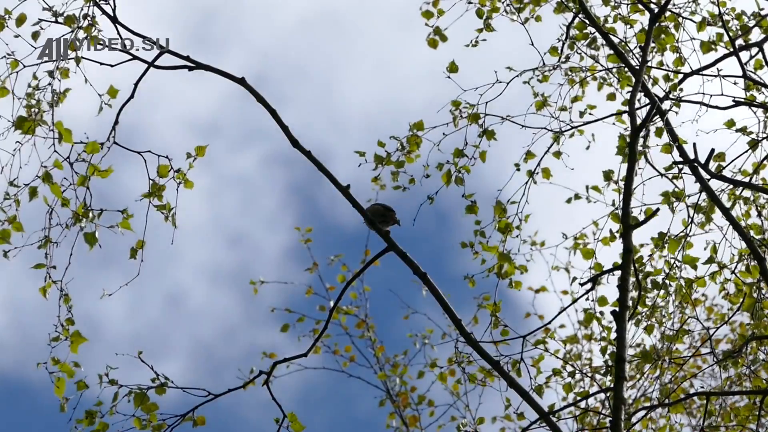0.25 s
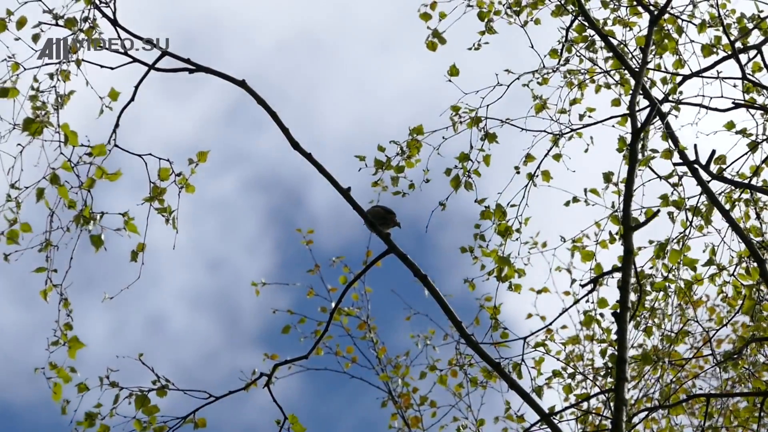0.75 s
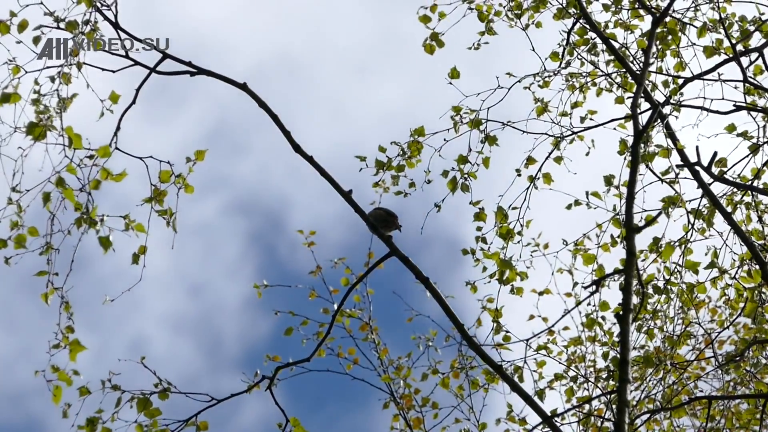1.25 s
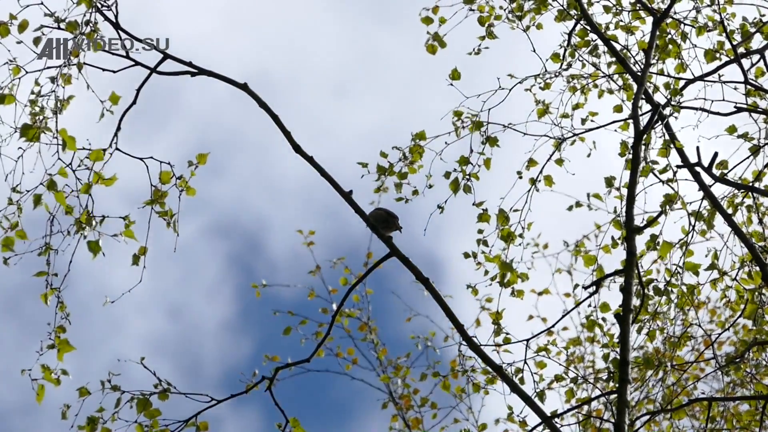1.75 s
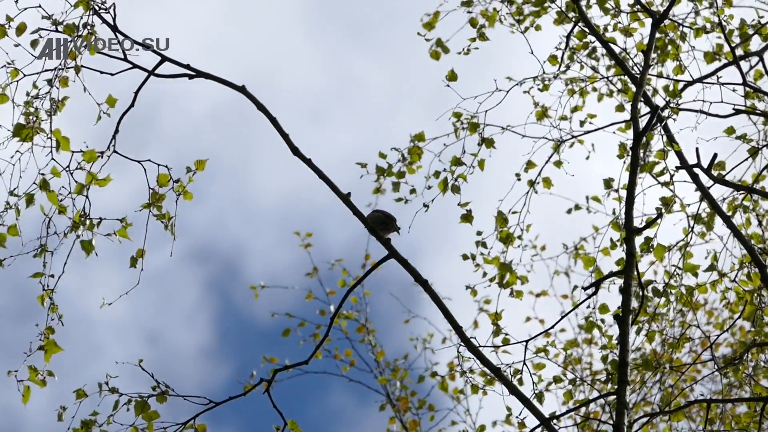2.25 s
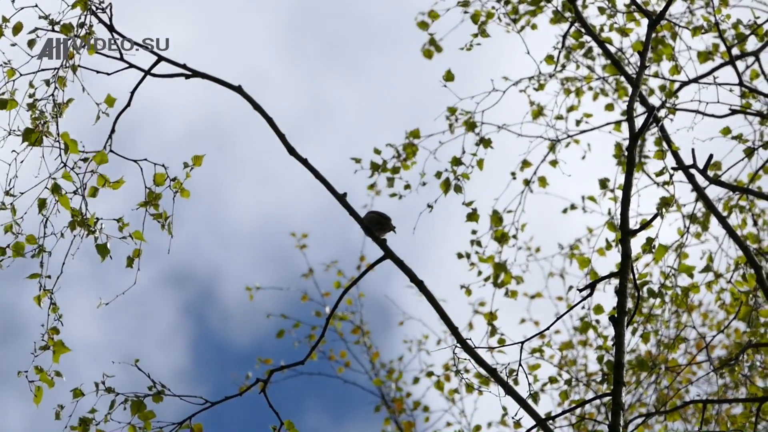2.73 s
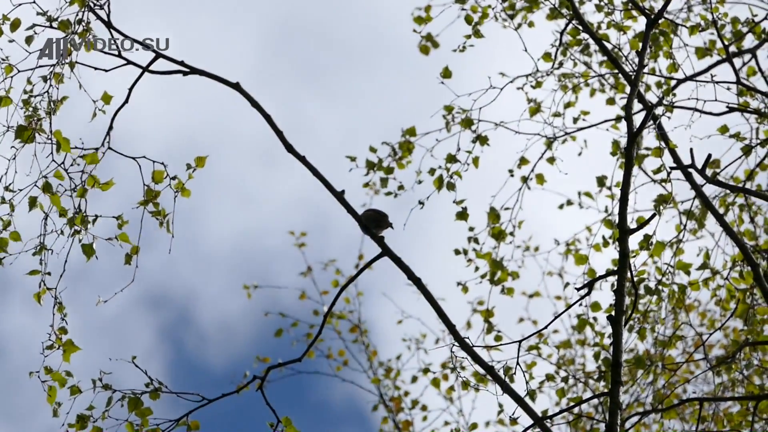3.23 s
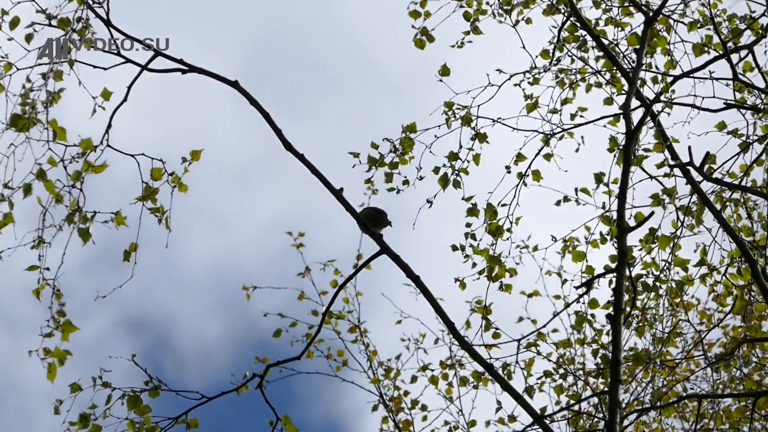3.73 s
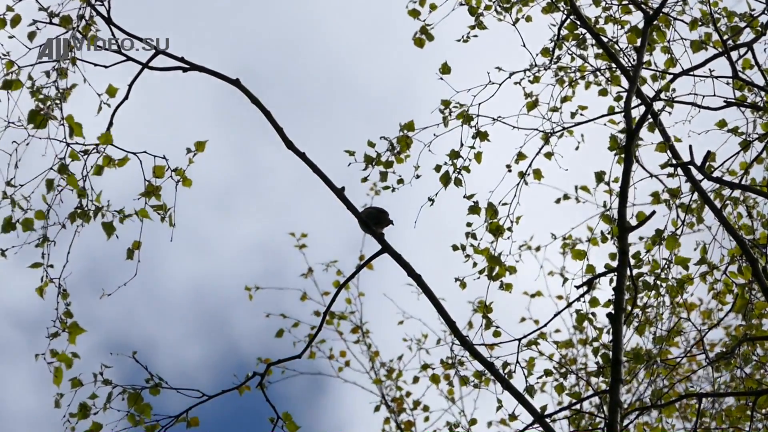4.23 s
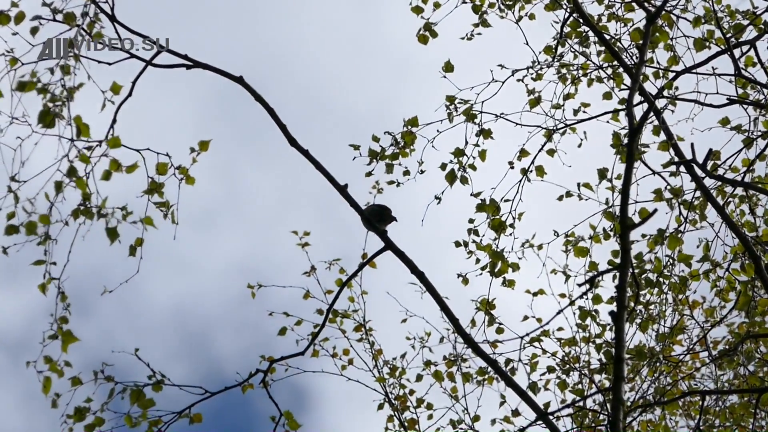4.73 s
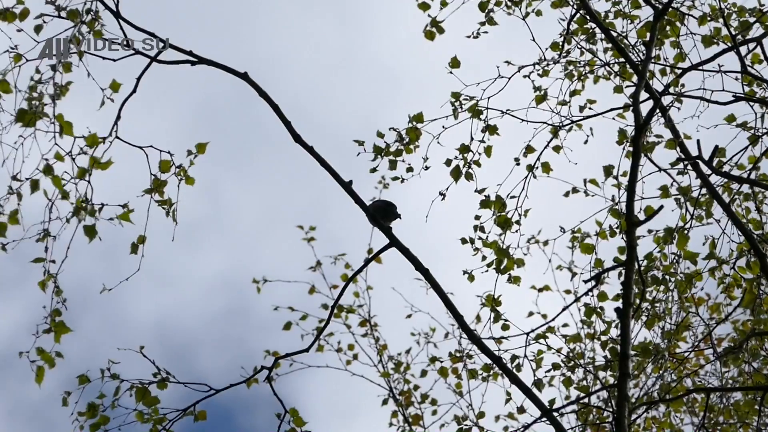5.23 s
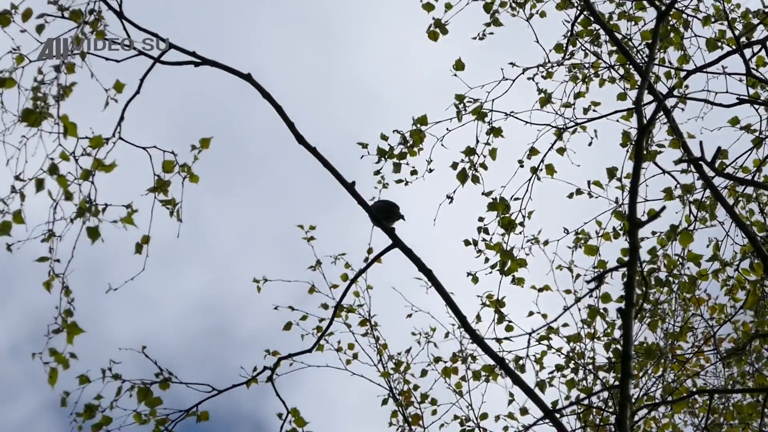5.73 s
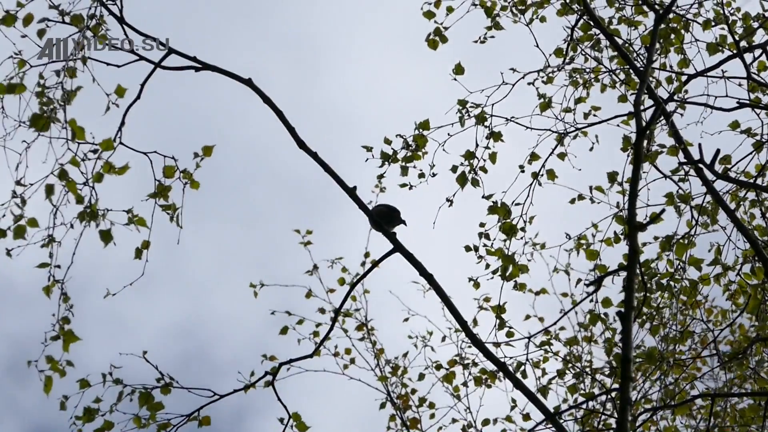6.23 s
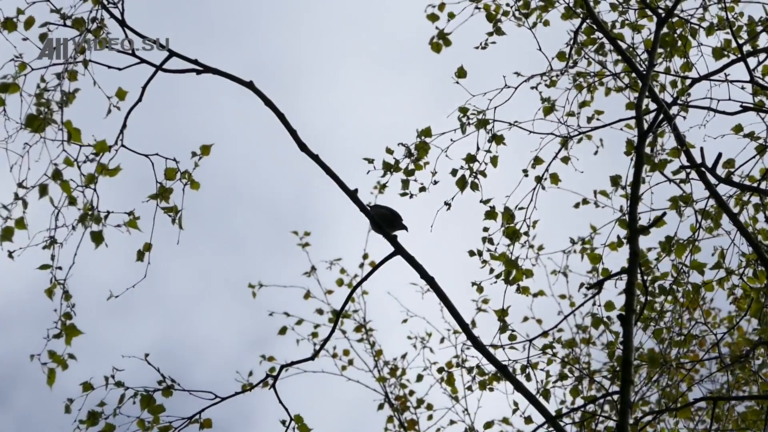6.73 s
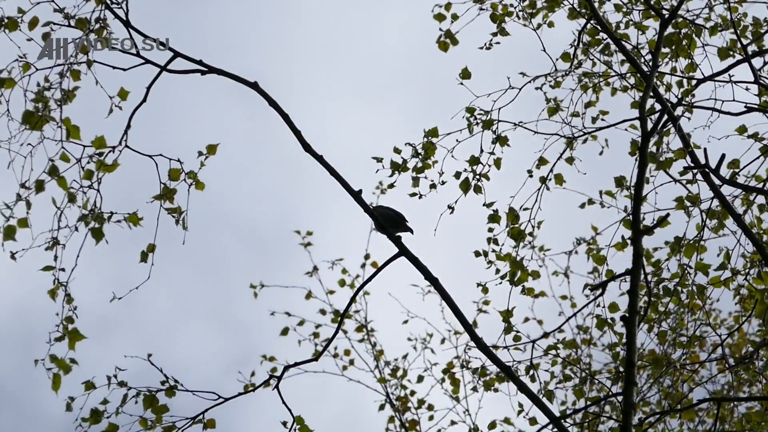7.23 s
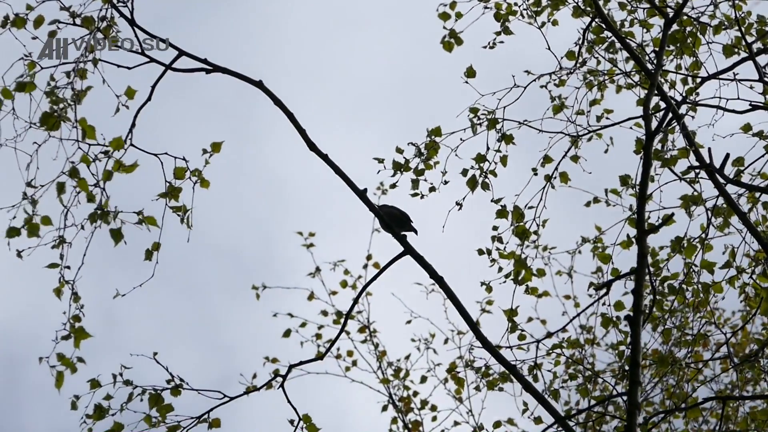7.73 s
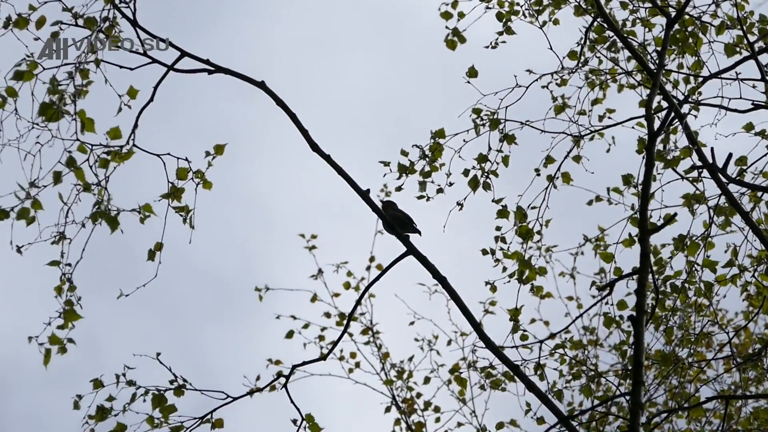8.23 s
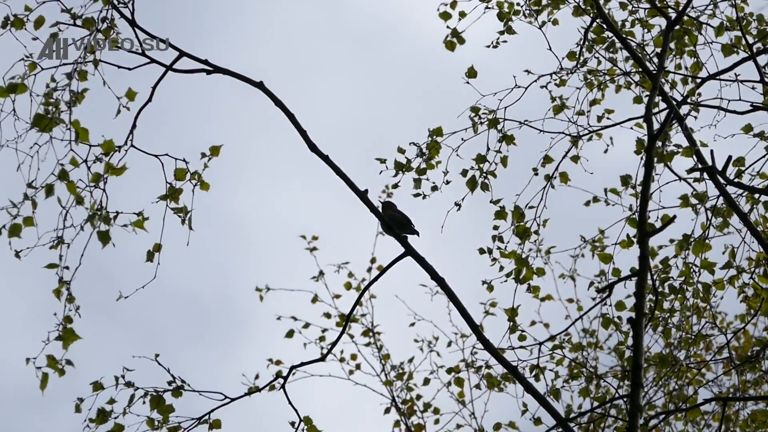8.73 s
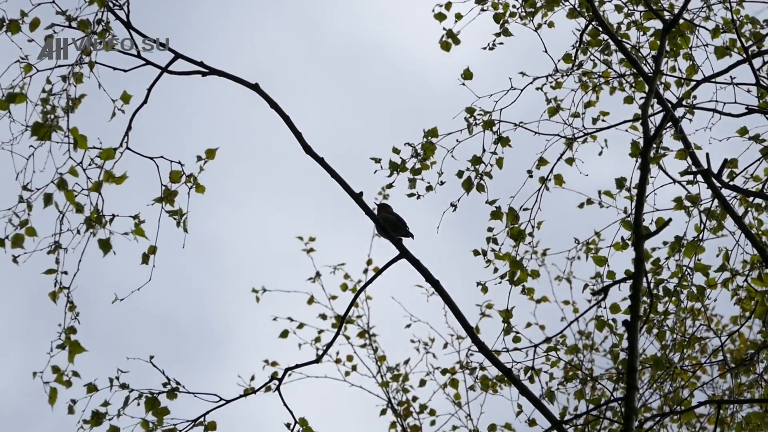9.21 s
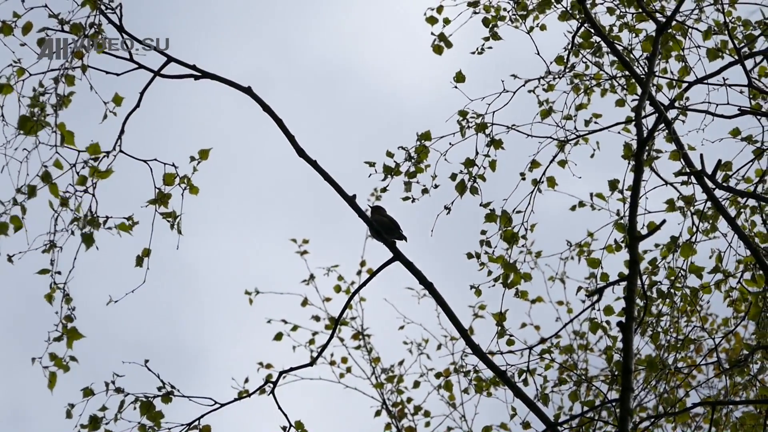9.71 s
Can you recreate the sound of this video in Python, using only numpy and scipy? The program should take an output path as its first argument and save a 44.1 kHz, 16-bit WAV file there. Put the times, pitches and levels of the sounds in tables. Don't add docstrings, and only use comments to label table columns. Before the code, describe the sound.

High, sweet robin song in two quick bursts rings among the trees, with fainter birds answering between, a few dry twig snaps and soft air.

```python
import sys
import numpy as np
from scipy import signal
from scipy.fft import rfft, irfft, next_fast_len
from scipy.io import wavfile
from scipy.ndimage import uniform_filter1d, map_coordinates

SR = 44100
rng = np.random.default_rng(int(sys.argv[2]) if len(sys.argv) > 2 else 0)


def to_wav(s):
    ch = np.atleast_2d(s).T
    pcm = np.round(np.clip(ch, -1, 1) * 32767)
    wavfile.write(sys.argv[1], SR, pcm.astype(np.int16))


def undo_db(level):
    steps = np.asarray(level, float) / 20
    return 10 ** steps


N = 439677

# (share of note [0-1], way from main to outer pitch [0-1], level [dB])
SWELL = [(0, 1.0, -10), (0.551, .1, 0.0), (1, 0.055, -17.5)]


def unit(x):
    return x / np.sqrt(np.mean(x ** 2) + 1e-20)


def along(points, hz):
    point_hz, value = np.transpose(points)
    return np.interp(np.log(hz + 1), np.log(point_hz + 1), value)


def wobble(rate, size=N):
    knots = rng.standard_normal(int(size * rate / SR) + 4)
    return map_coordinates(knots, [np.arange(size) * rate / SR])


def filtered(x, response):
    m = next_fast_len(N + 8192)
    return irfft(rfft(x, m) * response(np.fft.rfftfreq(m, 1 / SR)), m)[..., :N]


def add(track, s, sound):
    part = track[..., max(round(s * SR), 0):][..., :sound.shape[-1]]
    part += sound[..., :part.shape[-1]]


def pair(gain, alike):
    turn = lambda hz: np.arccos(np.clip(along(alike, hz), -1, 1)) / 2
    colour = lambda hz: gain(hz) * [np.cos(turn(hz)), np.sin(turn(hz))]
    mid, side = filtered(rng.standard_normal((2, N)), colour)
    return unit(np.array([mid + side, mid - side]))


def robin():
    # (time [s], haze [dB])
    breath = [(1.4, -12), (2.1, -25.5), (2.3, -35.5), (3.2, -22.5), (6.6, -15), (6.9, -11.5), (7.05, -35.5),
              (7.25, -36), (7.4, -31.5), (7.9, -46.5), (7.96, -21)]
    # (time [s], centre pitch [Hz], level [dB])
    buzzed = [
        [(2.579, 4520, -24.5), (2.595, 4630, -24.5), (2.62, 4735, -26.5), (2.66, 4573, -32.5),
         (2.715, 4480, -34)],
        [(7.29, 6990, -43), (7.31, 7630, -34), (7.335, 7970, -32.5), (7.358, 7900, -33)],
        [(6.878, 5320, -47.5), (6.89, 4790, -43.5), (6.897, 4430, -35), (6.906, 4616, -36), (6.917, 4575, -39)],
    ]
    # (flutter [dB], breath [dB], buzz rate [Hz], pitch swing [Hz], beat [0-1])
    buzz_settings = [(-6.0, -25.5, 198, 330, 0.49), (4.5, -28.0, 194, 200, 0.2), (2.0, -8.5, 188, 350, 0.2)]
    voice, edge_s = np.zeros(N), .004
    for note in song():
        haze_db = np.interp(note[0][0], *np.transpose(breath))
        add(voice, note[0][0], whistle(note, edge_s, flutter_db=.9, breath_db=haze_db))
    for note, (flutter_db, breath_db, buzz_hz, swing_hz, beat) in zip(buzzed, buzz_settings):
        add(voice, note[0][0], whistle(note, edge_s, flutter_db, breath_db, buzz_hz, swing_hz, beat))
    direct = undo_db(-0.5) * close(voice) * undo_db([[.3], [-.3]])
    heard = direct + undo_db(-6.0) * wood(voice, onset_s=0.0025)
    strain_gain = lambda hz: undo_db(along([(4000, -7.0), (5200, 8.0), (8500, 3.0)], hz))
    strain = filtered(heard[0], strain_gain)
    effort = np.sqrt(np.abs(uniform_filter1d(strain ** 2, size=2600)))
    rush_points = [(3500, -28.0), (6500, 6.5), (9800, -11), (12000, 1.5), (16000, -18.0)]
    rush = pair(lambda hz: undo_db(along(rush_points, hz)), [(6000, 0.9)])
    return heard + undo_db(-37) * effort * rush


def song():
    # (share of note [0-1], way from main to outer pitch [0-1, may overshoot], level [dB])
    rise = [(0, 0.88, -0.5), (0.202, 0.25, -3.5), (.42, 0.067, 4), (1, 0.096, -14)]
    # (share [0-1], way [0-1], level [dB])
    arch = [(0, 1, -4), (.13, .3, -4), (.33, 0.028, -3), (.65, .17, -2.5), (1, .6, -8)]
    # (share [0-1], way [0-1], level [dB])
    hook = [(0, .06, -4.5), (.55, .05, -10), (.8, 0, 0), (.88, .3, 3.5), (1, 1, -8)]
    # (share [0-1], way [0-1], level [dB])
    slide = [(0, 0.827, 2.5), (0.399, 0.48, -3.5), (1, 0.095, 2.5)]
    # (share [0-1], way [0-1], level [dB])
    drop_gesture = [(0, 0.95, -2), (.3, 0.85, -6), (1, 0.0, -20)]
    # (time [s], length [s], main pitch [Hz], outer pitch [Hz], level [dB])
    rises = [
        (1.655, 0.071, 5580, 4910, -33.5),
        (1.856, 0.077, 5070, 4530, -28),
        (6.622, 0.05, 4850, 3700, -44.5),
    ]
    # (time [s], length [s], main [Hz], outer [Hz], level [dB])
    arches = [
        (1.537, 0.079, 5910, 4496, -37),
        (1.752, .066, 5400, 4395, -28),
    ]
    # (time [s], length [s], main [Hz], outer [Hz], level [dB])
    hooks = [
        (1.597, .041, 6050, 4060, -35.5),
        (1.682, .049, 5940, 4070, -27),
    ]
    # (time [s], length [s], main [Hz], outer [Hz], level [dB])
    slides = [
        (3.034, 0.035, 3100, 4100, -32.5),
        (7.09, 0.0094, 2930, 3300, -44),
        (1.785, .048, 5760, 5720, -33),
    ]
    # (time [s], length [s], main [Hz], outer [Hz], level [dB])
    drops = [
        (6.931, 0.015, 2210, 3260, -36),
        (7.707, 0.0091, 6600, 8200, -28),
        (7.885, 0.02, 5840, 7670, -24.5),
    ]
    # (time [s], length [s], main [Hz], outer [Hz], level [dB])
    strands = [(1.57, 0.031, 6400, 5940, -44), (1.574, 0.051, 5893, 5840, -39),
               (1.68, .032, 6270, 6080, -43), (1.79, 0.018, 6320, 6160, -51), (6.95, .09, 3140, 3400, -50),
               (7.3, .05, 12150, 11200, -58), (6.885, 0.033, 8960, 9200, -55.5),
               (8.01, 0.026, 3990, 5500, -43.5), (8.174, 0.015, 5150, 6050, -40)]
    # (time [s], length [s], main [Hz], outer [Hz], level [dB])
    warbles = [
        (7.416, 0.098, 8890, 9220, -27.5),
        (7.598, 0.12, 8515, 9170, -25),
        (7.763, .128, 8010, 9000, -20),
    ]
    warble_swing_hz = [169, 220, 380]
    # (time [s], pitch [Hz], level [dB])
    flourishes = [
        [(2.362, 4040, -42), (2.372, 3584, -28.5), (2.41, 3860, -29), (2.445, 3910, -28), (2.47, 3830, -23),
         (2.5, 3772, -24.5)],
        [(2.822, 4530, -47), (2.832, 3760, -25), (2.856, 4067, -24), (2.867, 3267, -24), (2.879, 3062, -23),
         (2.897, 3315, -18.5), (2.915, 3544, -22), (2.955, 3483, -36)],
        [(3.128, 4220, -32), (3.145, 4690, -38.5), (3.158, 5500, -39.5), (3.17, 5700, -49)],
        [(6.824, 7620, -57), (6.853, 7700, -48.5), (6.878, 7040, -44.5), (6.892, 5400, -44)],
        [(6.917, 4090, -43), (6.924, 3594, -30), (6.934, 3624, -33), (6.942, 3550, -45.5), (6.975, 3540, -52)],
        [(6.955, 2210, -53.5), (6.995, 2675, -44), (7.065, 2658, -57)],
    ]
    # (time [s], pitch [Hz], level [dB])
    more_flourishes = [
        [(1.395, 3850, -54), (1.408, 4400, -48.5), (1.416, 4720, -39), (1.425, 4840, -47), (1.44, 4680, -44.5),
         (1.448, 4700, -55)],
        [(1.96, 4150, -48), (1.968, 4340, -33), (1.978, 4750, -29), (1.986, 4900, -30.5), (2.0, 4996, -28),
         (2.013, 4996, -47), (2.021, 4960, -29), (2.04, 4870, -47)],
        [(2.553, 4610, -29), (2.559, 4235, -25), (2.568, 4390, -20.5), (2.574, 4580, -23), (2.581, 4620, -30.5)],
        [(2.718, 4000, -32), (2.728, 3610, -32.5), (2.738, 3315, -34.5), (2.745, 3550, -44.5),
         (2.765, 3550, -45)],
        [(3.078, 3870, -33), (3.088, 3920, -23), (3.11, 3994, -22.5), (3.128, 4057, -18.5),
         (3.142, 4004, -33.5), (3.165, 4050, -28)],
        [(7.072, 3350, -33), (7.083, 3366, -24), (7.095, 3350, -39)],
        [(7.118, 4240, -43), (7.124, 3860, -28), (7.133, 4020, -24.5), (7.143, 4100, -37), (7.165, 4100, -18.5),
         (7.19, 4075, -20.5), (7.212, 4108, -27.5), (7.226, 4056, -42)],
    ]
    # (time [s], pitch [Hz], level [dB])
    chirps = [
        [(7.968, 5080, -18), (7.976, 3416, -37), (7.985, 4400, -21.5), (7.994, 4080, -29), (8.003, 3530, -28),
         (8.012, 3160, -37.5), (8.02, 2182, -46.5)],
        [(8.045, 2300, -44.5), (8.058, 3320, -27), (8.068, 3965, -14), (8.077, 4464, -18.5), (8.083, 4420, -16),
         (8.087, 3620, -23), (8.093, 2150, -39)],
        [(8.145, 2072, -43.5), (8.155, 3306, -32.5), (8.164, 4540, -15), (8.169, 5090, -14), (8.174, 5350, -23),
         (8.179, 5300, -39.5)],
        [(8.245, 2220, -43), (8.255, 2884, -40.5), (8.263, 3790, -25.5), (8.269, 4300, -12.5),
         (8.274, 4636, -17.5), (8.2785, 5060, -14.5), (8.281, 4295, -19), (8.29, 2150, -41)],
    ]
    kinds = [(rises, rise), (arches, arch), (hooks, hook), (slides, slide), (drops, drop_gesture),
             (strands, slide)]
    plain = [shaped(row, gesture) for rows, gesture in kinds for row in rows]
    trembling = [warble(row, swing_hz) for row, swing_hz in zip(warbles, warble_swing_hz)]
    return plain + trembling + flourishes + more_flourishes + chirps


def warble(row, swing_hz):
    # (share of note [0-1], way from main to outer pitch [0-1, may overshoot], level [dB])
    gesture = [(0, 0.906, -11.5), (.11, 0.0, -3), (.4, 0.0, -1.5), (.75, 0.0, -1.5), (1, -0.43, -3)]
    rate_hz, lag_s, fade_s, crest_loss_db_per_khz = 46, 0.045, 0.045, 6
    s, hz, db = shaped(row, gesture).T
    t = np.arange(s[0], s[-1], 1 / 1000)
    since_s = t - s[0] - lag_s
    depth_hz = swing_hz * np.exp(-(np.maximum(since_s, 0) / fade_s) ** 2)
    tremble_hz = depth_hz * np.cos(2 * np.pi * np.maximum(rate_hz * since_s, -.5))
    loss_db = crest_loss_db_per_khz * np.maximum(tremble_hz, 0) / 1000
    return np.transpose([t, np.interp(t, s, hz) + tremble_hz, np.interp(t, s, db) - loss_db])


def shaped(row, gesture):
    s, length_s, main_hz, outer_hz, db = row
    share, way, swell_db = np.transpose(gesture)
    return np.transpose([s + share * length_s, main_hz + way * (outer_hz - main_hz), db + swell_db])


def whistle(note, edge_s, flutter_db, breath_db, buzz_hz=0, swing_hz=0, beat=0, loose=0.33):
    s, hz, db = np.transpose(note)
    t = np.arange(s[0], max(s[-1], s[0] + 0.017), 1 / SR)
    soft = lambda v: uniform_filter1d(np.interp(t, s, v), size=130, mode="nearest")
    pitch_hz = soft(hz)
    shake = 2 * np.pi * buzz_hz * t + loose * wobble(70, size=len(t))
    grown = np.clip((t - s[0]) / 0.05, 0, 1)
    phase = 2 * np.pi * np.cumsum(pitch_hz + swing_hz * grown * np.sin(shake)) / SR
    to_end_s = np.minimum(t - t[0], t[-1] - t)
    ends = np.sin(np.pi / 2 * np.clip(to_end_s / edge_s, 0, 1)) ** 2
    flutter = flutter_db * wobble(96.3, size=len(t))
    level = undo_db(soft(db) + 6.5 + flutter) * ends * (1 + beat * np.cos(shake + 0.296))
    wide = .13 * rng.standard_normal(len(t))
    turbulence = undo_db(breath_db) * (wobble(2200, size=len(t)) + wide)
    glide = np.minimum(np.abs(np.gradient(pitch_hz)), 2.5)
    overtone = undo_db(-41.5 + 3.8 * (4500 - pitch_hz) / 1000 + 3.5 * glide)
    return level * ((1 + turbulence) * np.sin(phase) + overtone * np.sin(2 * phase))


def close(voice):
    # (delay [s], level [dB], left-right difference [dB])
    reflections = [(.0012, -23.5, 10), (.0043, -15, -5), (.0065, -17, 6), (.0087, -17, -4), (.012, -10, 2),
                   (.018, -17, -4), (.028, -18, 3)]
    near = np.array([voice, voice])
    for delay_s, db, pan_db in reflections:
        add(near, delay_s, undo_db(db + pan_db * np.array([[.5], [-.5]])) * voice)
    return near


def wood(x, onset_s):
    # (frequency [Hz], t60 [s])
    decay = [(2000, .55), (3400, .56), (5300, .52), (7800, .42), (9000, .5)]
    # (frequency [Hz], likeness [0-1])
    echo_alike = [(3000, 0.5), (5500, 0.8), (8000, 0.5)]
    wet, step = np.zeros((2, N)), SR // 4
    fade = np.hanning(2 * step)
    x = np.pad(x, (step, 2 * step))
    for k in range(0, N + step, step):
        piece = x[k:k + 2 * step]
        if not piece.any():
            continue
        hz, t, z = signal.stft(rng.standard_normal((2, SR * 3 // 5)), SR, nperseg=256)
        shape = undo_db(-60 * t / along(decay, hz)[:, None]) * (1 - np.exp(-t / onset_s))
        trunks = undo_db(2.5 * wobble(45 * 128, size=len(t)))
        alike = np.clip(along(echo_alike, hz), 0, 1)[:, None]
        z[1] = alike * z[0] + np.sqrt(1 - alike ** 2) * z[1]
        tail = signal.istft(z * shape * trunks, SR, nperseg=256)[1]
        tail = tail / np.linalg.norm(tail[0])
        echo = signal.fftconvolve(fade * piece[None], tail, axes=1)
        add(wet, (k - step) / SR, echo[:, max(step - k, 0):])
    return wet


def nearer():
    # (time [s], pitch [Hz], level [dB])
    flicks = [
        [(0, 2900, -32.5), (.012, 3320, -40.5), (.021, 3380, -37), (.03, 3100, -42), (.042, 2450, -43)],
        [(.257, 3760, -45), (.263, 3466, -39), (.272, 3000, -44), (.285, 2650, -47), (.3, 2480, -47)],
        [(.511, 4000, -64), (.516, 4500, -56), (.521, 5150, -63), (.532, 5350, -66)],
    ]
    # (time [s], length [s], centre pitch [Hz], opening pitch [Hz], level [dB])
    squeak = (.122, .042, 5900, 5700, -47)
    calls = np.zeros(N)
    for note in flicks:
        add(calls, note[0][0], whistle(note, edge_s=0.0015, flutter_db=2.0, breath_db=-13.5))
    burr = whistle(shaped(squeak, SWELL), edge_s=.004, flutter_db=1.0, breath_db=-4.5, buzz_hz=241,
                   swing_hz=600, beat=0.43, loose=2.9)
    add(calls, squeak[0], burr)
    return undo_db(-2.5) * close(calls) * undo_db([[1.2], [-1.2]]) + undo_db(-4.5) * wood(calls, onset_s=.006)


def left_bird():
    # (time [s], peak level [dB], pitch at the peak [Hz])
    rising = [(8.791, -56, 4620), (8.8997, -59, 4500), (8.975, -52.5, 4650), (9.054, -54, 4530),
              (9.1316, -50.5, 4560), (9.208, -43, 4560), (9.2867, -44.5, 4670), (9.3642, -46.5, 4550)]
    # (time [s], level [dB], lowest pitch [Hz], opening tick level [dB])
    sweeps = [
        (9.426, -49, 3026, -56),
        (9.559, -47.5, 2640, -52),
        (9.688, -49, 2716, -50),
        (9.815, -45.5, 2583, -45.5),
        (9.941, -42.5, 2405, -46.5),
    ]
    calls = np.zeros(N)
    # (s, pitch ratio, dB)
    rise = np.array([(-.02, .8, -34), (-.003, .97, -19), (.003, 1.01, -2.5), (.011, 1.16, -15)])
    for s, db, peak_hz in rising:
        chip = rise * [1, peak_hz, 1] + [s, 0, db]
        add(calls, chip[0, 0], whistle(chip, edge_s=.005, flutter_db=2.5, breath_db=-8))
    chips = calls.copy()
    for s, db, low_hz, tick_db in sweeps:
        dip = [(s - .004, 3780, tick_db - 9), (s + .003, 3650, tick_db), (s + .013, 3300, db - 22),
               (s + .036, low_hz, db - 5), (s + .048, 3250, db - 9), (s + .055, 3650, db + 2),
               (s + .062, 4400, db - 13)]
        add(calls, s - .004, whistle(dip, edge_s=0.004, flutter_db=1.5, breath_db=-7))
    leaves = undo_db(2 * wobble(150))
    direct = undo_db(-1.5) * leaves * close(calls)
    echo = undo_db(-1.0) * wood(calls - 0.59 * chips, onset_s=0.0041)
    return undo_db([[2.5], [-2.5]]) * (direct + echo)


def neighbours():
    # (time [s], length [s], main pitch [Hz], opening pitch [Hz], level [dB])
    far = [
        (1.84, 0.12, 3574, 3650, -58),
        (2.26, 0.21, 3614, 3405, -56.5),
        (3.31, 0.092, 4192, 3890, -52.5),
        (5.34, 0.039, 3675, 3690, -63.5),
        (7.55, .075, 7480, 7400, -42),
        (7.622, 0.042, 7640, 7650, -39.5),
    ]
    # (time [s], high level [dB], low level [dB])
    seesaw = [(3.611, -61, -61.5), (4.06, -60.5, -56.5), (4.485, -61.5, -66), (4.93, -66, -51.5),
              (5.374, -59, -52.5)]
    # (time [s], low level [dB], high level [dB])
    answer = [(4.68, -67.5, -68), (5.13, -64, -69), (5.6, -61, -67), (6.06, -61.5, -68.5)]
    # (time [s], length [s], centre pitch [Hz], swing [Hz], level [dB], opening pitch [Hz])
    burrs = [(.04, 0.11, 3200, 260, -45.5, 3100), (0.101, .11, 3150, 300, -51.5, 3275),
             (.27, 0.1, 3450, 300, -53, 3740), (0.207, .06, 4300, 330, -44.5, 4250),
             (0.283, .1, 2620, 390, -46, 2790), (.35, 0.085, 2600, 420, -45.5, 2606),
             (0.421, 0.15, 2597, 200, -55.5, 2780), (4.672, 0.052, 4335, 420, -56, 4240)]
    # (time [s], length [s], main pitch [Hz], opening pitch [Hz], level [dB])
    under = [
        (2.554, 0.068, 2140, 1932, -45.5),
        (2.651, 0.13, 2310, 2182, -43.5),
        (2.762, .17, 2175, 2293, -45),
        (2.9, .2, 2180, 2207, -59),
    ]
    seesaw_gap_s, answer_gap_s = .18, .27
    calls = np.zeros((2, N))
    side = lambda: undo_db(rng.normal(0, 1.5) * np.array([[1], [-1]]))
    clear = far + [(s, .1, 5300, 5700, db) for s, db, _ in seesaw]
    clear += [(s, .18, 3650, 3440, db) for s, db, _ in answer]
    clear += [(s + answer_gap_s, .09, 4360, 4390, db) for s, _, db in answer]
    burred = [((s, length_s, hz, opening_hz, db), swing_hz, 3.0)
              for s, length_s, hz, swing_hz, db, opening_hz in burrs]
    burred += [((s + seesaw_gap_s, .09, 4234, 4148, db), 140, 1.1) for s, _, db in seesaw]
    for row in under:
        pulsed = whistle(shaped(row, SWELL), edge_s=0.0053, flutter_db=4.5, breath_db=-15.0, buzz_hz=45.6,
                         swing_hz=60.5, beat=0.48)
        add(calls, row[0], pulsed)
    for row in clear:
        note = shaped(row, SWELL)
        add(calls, row[0], side() * whistle(note, edge_s=0.0045, flutter_db=3.0, breath_db=-12.0))
    for row, swing_hz, loose in burred:
        burr = whistle(shaped(row, SWELL), edge_s=0.0053, flutter_db=3.0, breath_db=-10.5, buzz_hz=248.0,
                       swing_hz=swing_hz, beat=0.4, loose=loose)
        add(calls, row[0], side() * burr)
    return undo_db(-2.5) * calls + wood(calls.mean(axis=0), onset_s=0.01)


def ticks():
    # (time [s], peak level [dB], centre pitch [Hz], crack share [ratio])
    snaps = [(4.22, -42.5, 6020, .3), (4.42, -37, 4750, .1), (4.4725, -22, 3000, 0.06),
             (4.605, -37, 2630, 0.1), (4.642, -31.5, 2400, 0.3), (4.648, -35, 2760, .3),
             (4.649, -38, 7000, 0.2), (4.6916, -31.5, 5600, 1), (4.69, -34.5, 2900, .3),
             (4.721, -37, 2980, 1.37), (4.771, -50, 2900, .2)]
    # (time [s], level [dB])
    nudges = [
        (3.59, -36),
        (4.66, -37.5),
        (5, -52),
    ]
    out, t = np.zeros(N), np.arange(SR // 8) / SR
    for s, db, hz, crack_share in snaps:
        crack = uniform_filter1d(rng.standard_normal(len(t)), size=3)
        ring = np.sin(2 * np.pi * hz * t) + crack_share * crack
        add(out, s, undo_db(db - 60 * t / 0.0054) * (1 - np.exp(-t / 0.00036)) * ring)
    bumps = np.zeros((2, N))
    for s, db in nudges:
        swell = np.sin(np.pi * t / t[-1]) ** 2
        add(bumps, s, undo_db(db) * swell * np.sin(2 * np.pi * 40 * t) * [[1], [-.5]])
    return out + bumps


def floor():
    # (time [s], level [dB])
    drift = [(0.0, -59), (4.39, -58.5), (5.11, -57.5), (5.5, -59.5), (6.302, -58.5), (6.72, -59.5),
             (9.97, -59)]
    # (frequency [Hz], density [dB per Hz])
    air_colour = [(12, -36.5), (20, -5.5), (205, -5), (262, -10), (343, -11), (408, 2.5), (472, -11),
                  (618, -9.5), (1030, -17.5), (1770, -17), (4080, -28), (7000, -25.5), (9100, -60),
                  (15400, -120)]
    # (frequency [Hz], likeness [-1 to 1])
    air_alike = [(25, -.3), (60, 0.4), (200, 0.67), (500, 0.76), (1500, 0.72), (5000, 0.3)]
    # (centre [Hz], width [Hz], level [dB], left-right likeness [-1 to 1])
    hum_bands = [(266.3, 30.4, -58.5, 0.82), (299.6, 29.5, -59, -0.14), (407.5, 21.5, -57.5, 0.76)]
    # (frequency [Hz], density [dB per Hz])
    hiss_colour = [(1500, -42), (3000, -8), (6000, -12), (8000, -4.5), (12000, -2.5), (16000, 1)]
    drift_db = np.interp(np.arange(N) / SR, *np.transpose(drift))
    gusts_db = .6 * wobble(4)
    air = undo_db(drift_db + 7.5 + gusts_db) * pair(lambda hz: undo_db(along(air_colour, hz)), air_alike)
    hum = np.zeros((2, N))
    for centre_hz, width_hz, db, alike in hum_bands:
        throb_db = 1.5 * wobble(5)
        band = lambda hz: 1 / (1 + ((hz - centre_hz) / (width_hz / 2)) ** 4)
        hum += undo_db(db + throb_db) * pair(band, [(centre_hz, alike)])
    hiss = pair(lambda hz: undo_db(along(hiss_colour, hz)), [(3000, 0.768), (8000, 0.72), (12000, 0.98)])
    return air + hum + undo_db(-52.5) * hiss


def scene():
    return robin() + nearer() + left_bird() + neighbours() + ticks() + floor()


def low_pass(x):
    return signal.sosfilt(signal.butter(12, 15870, fs=SR, output="sos"), x)


def record(dry):
    rounded = dry / (1 + (dry / 1.3) ** 4) ** .25
    mix = filtered(rounded, lambda hz: hz < 15870)
    return low_pass(mix)


dry = scene()
out = record(dry)
to_wav(out)
```